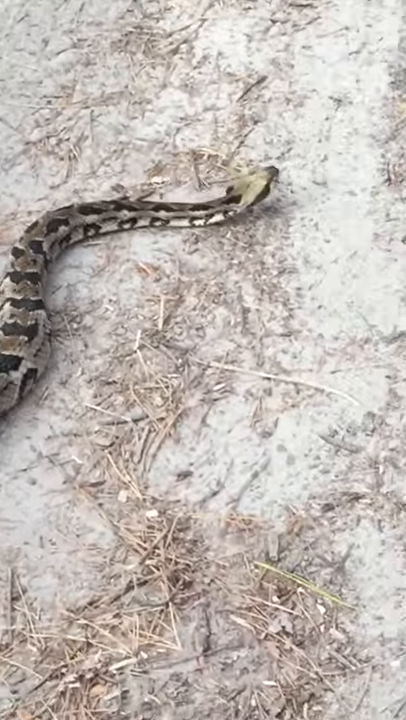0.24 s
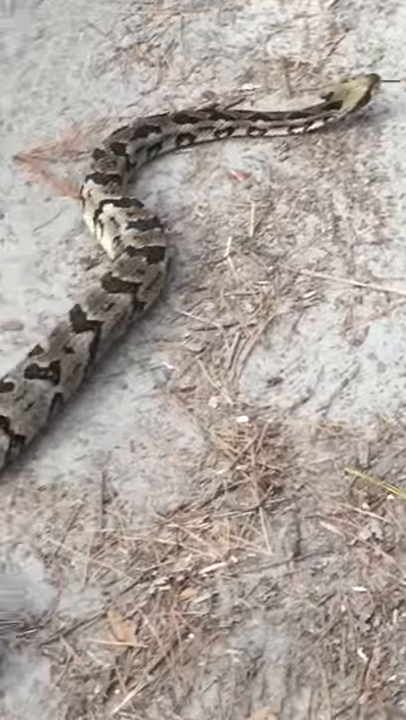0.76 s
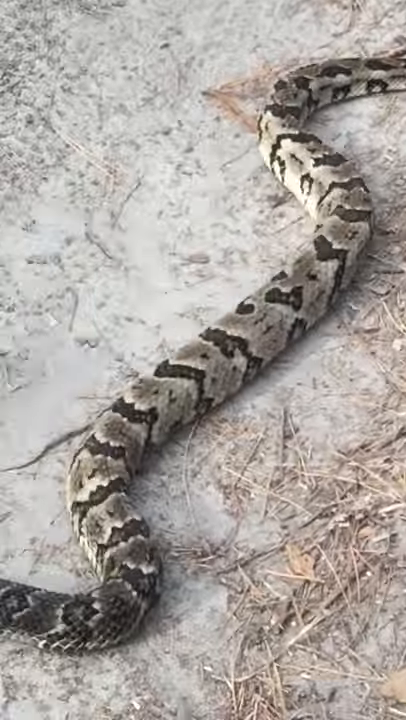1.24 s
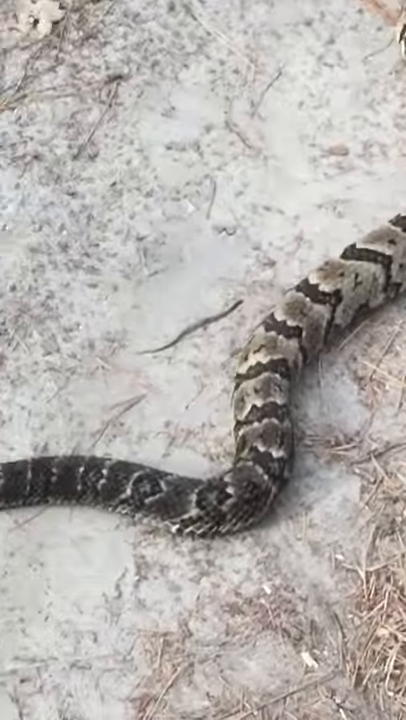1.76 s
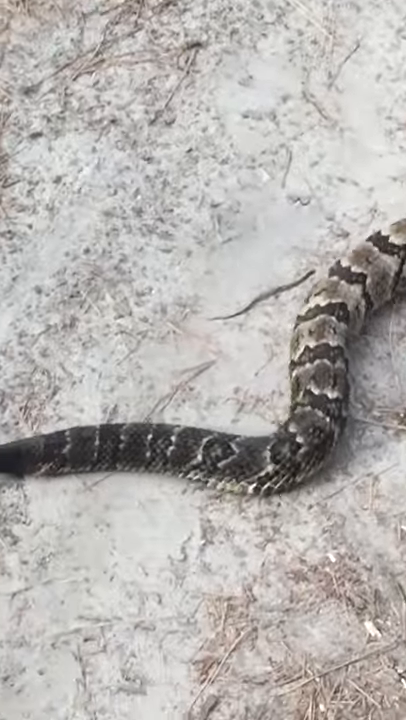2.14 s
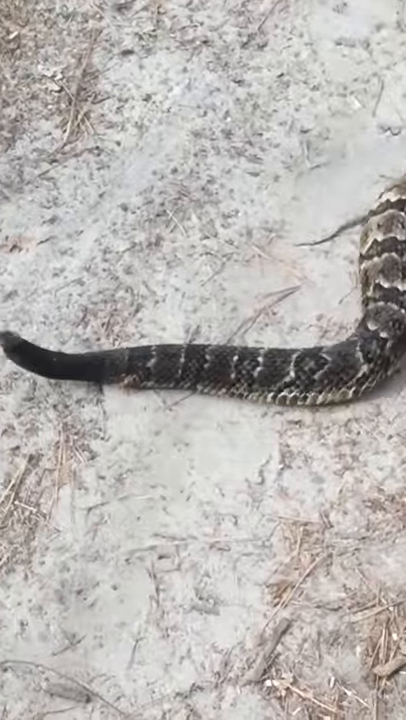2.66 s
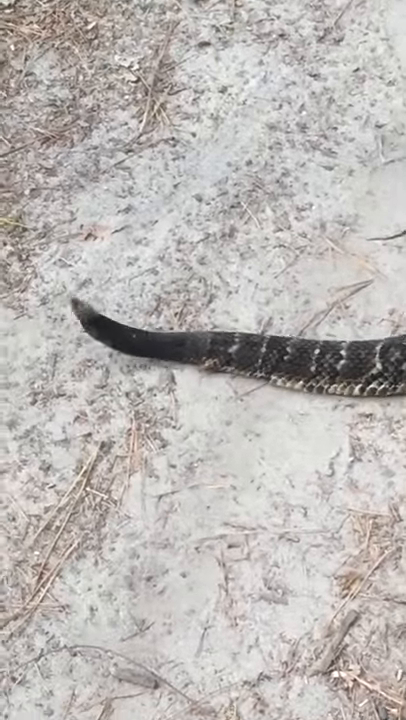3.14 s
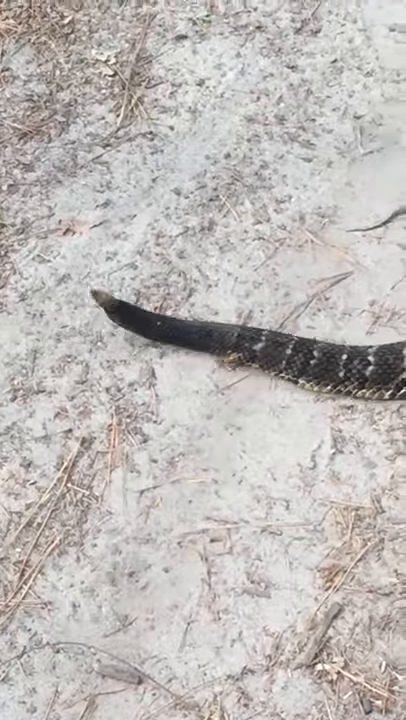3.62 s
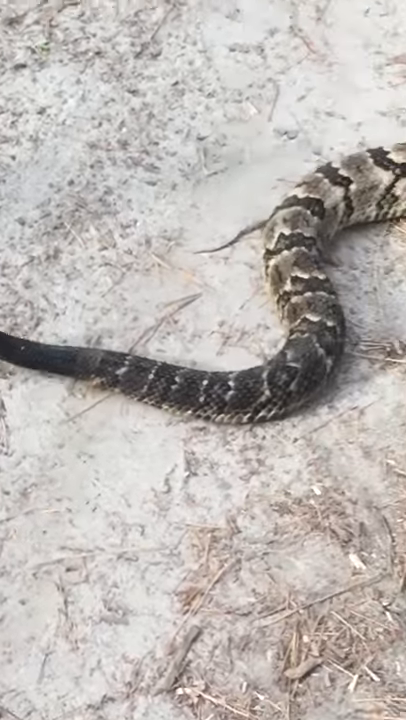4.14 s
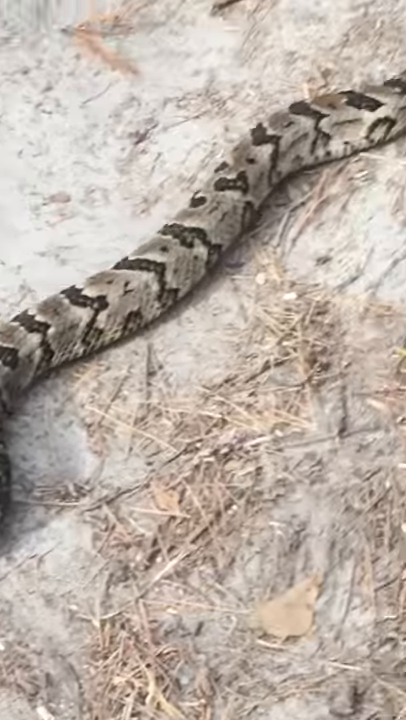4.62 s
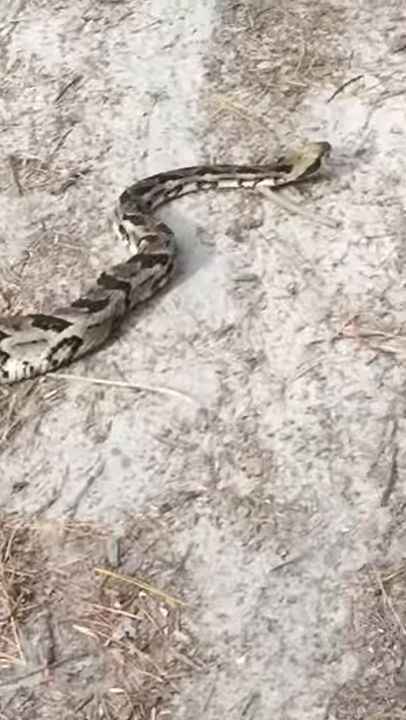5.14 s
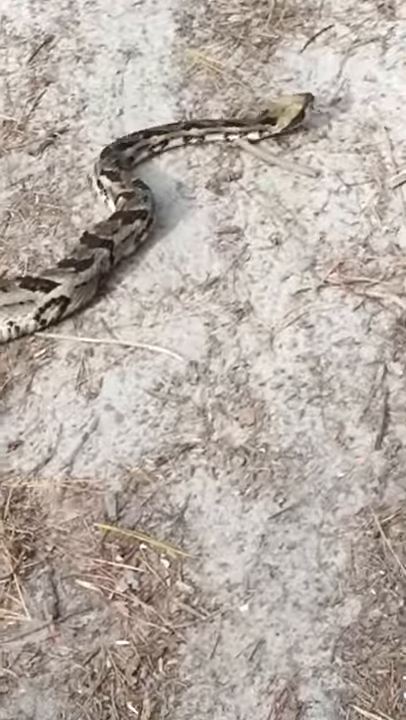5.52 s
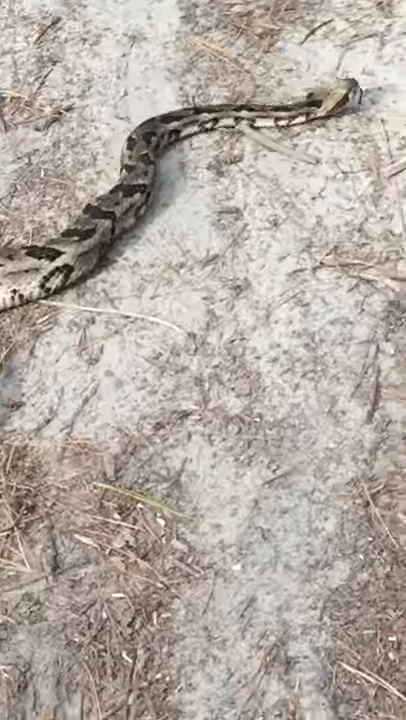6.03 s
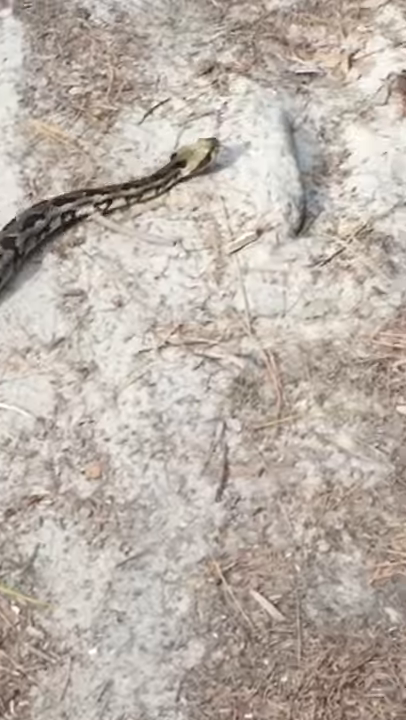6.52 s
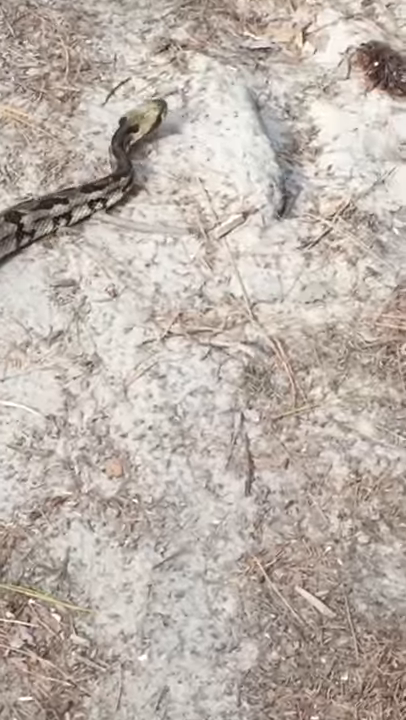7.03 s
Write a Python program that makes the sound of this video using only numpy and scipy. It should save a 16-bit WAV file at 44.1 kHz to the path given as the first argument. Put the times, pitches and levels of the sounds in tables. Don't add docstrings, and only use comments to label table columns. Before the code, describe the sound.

A rattlesnake's rattle is sounding from the first instant and continues unbroken for about 7.3 seconds. It is a dry, bright, grainy buzz, roughly 94 strokes a second, made of tiny hollow clicks and sharp sizzling edges, with no low body of its own. Around 0.2 and 0.36 seconds two soft, low thuds come from the hand holding the microphone. From about 0.8 to 5.2 seconds the tail is heard more side on; its timbre shifts noticeably around 3 to 4 seconds as it turns. After about 5.9 seconds it is drawn away, with slightly faster strokes and an airier treble edge. Far below lies faint traffic: puffs of rumble, an engine swell near 1.1 seconds, a smaller one near 6.5, and a slight tyre-hum rise around 6.1. Leaf litter rustles very softly, a little more toward the end. The place is open and nearly echo-free.

```python
import sys
import numpy as np
from scipy import signal
from scipy.fft import rfft, irfft, next_fast_len
from scipy.io import wavfile
from scipy.ndimage import uniform_filter1d, map_coordinates

SR = 44100
rng = np.random.default_rng(int(sys.argv[2]) if len(sys.argv) > 2 else 0)


def to_linear_factor(level_db):
    exponent = np.asarray(level_db, float) / 20
    return 10 ** exponent


def to_wav(s):
    ch = np.atleast_2d(s).T
    pcm = np.round(np.clip(ch, -1, 1) * 32767)
    wavfile.write(sys.argv[1], SR, pcm.astype(np.int16))


N = 320607
T = np.arange(N) / SR

# time in seconds, share turned away from 0 to 1.
AWAY = [(0, 1), (.45, .7), (.8, 0), (5.2, 0), (5.9, 1), (7.27, 1)]


def unit(x):
    return x / np.sqrt(np.mean(x ** 2) + 1e-20)


def curves(rows):
    s, *columns = np.transpose(rows)
    return [np.interp(T, s, column) for column in columns]


def filtered(x, response):
    m = next_fast_len(N + 8192)
    spectrum = rfft(x, m) * response(np.fft.rfftfreq(m, 1 / SR))
    return irfft(spectrum, m)[..., :N]


def coloured(x, spectrum):
    f, db = np.transpose(spectrum)
    return unit(filtered(x, lambda hz: to_linear_factor(np.interp(np.log(hz + 1), np.log(f), db))))


def wobble(rate):
    knots = rng.standard_normal(int(N * rate / SR) + 4)
    return map_coordinates(knots, [T * rate])


def hump(s, half):
    return np.exp(-((T - s) / half) ** 2 / 2)


def patchy(depth_db):
    z = signal.stft(rng.standard_normal(N), nperseg=1024)[2]
    field = uniform_filter1d(rng.standard_normal(z.shape), size=5, axis=0)
    field = uniform_filter1d(field, size=5, axis=1)
    return signal.istft(z * to_linear_factor(depth_db * unit(field)), nperseg=1024)[1][:N]


def dip(hz, dip_hz, width_hz, depth):
    return 1 - np.clip(depth, 0, 1) / (1 + ((hz - dip_hz) / width_hz * 2) ** 2)


def summed(times, shapes):
    at = np.round(times * SR).astype(int)[:, None] + np.arange(shapes.shape[1])
    inside = (at >= 0) & (at < N)
    return np.bincount(at[inside], shapes[inside], N)


def road_rumble():
    # frequency in Hz, level in dB per Hz.
    rumble_spectrum = [(13, -58), (22, -13), (47, -4.5), (65, 7.5), (130, -6), (170, -78), (290, -120)]
    # time in seconds, rise in dB.
    puffs = [(.62, 11), (1.3, 5), (1.82, 11), (1.97, 9), (2.16, 9.5), (2.54, 4), (2.84, 4), (3.24, 3),
             (3.94, 8), (4.19, -3), (4.38, 2), (4.68, 3), (5.23, 4.5), (5.33, 0), (5.75, 8), (5.84, 8),
             (6.03, 5), (6.7, 8), (7.04, 8), (7.22, 5)]
    half_s = .028
    puffs_db = sum(db * hump(s, half_s) for s, db in puffs) + 1.4 * wobble(9)
    return to_linear_factor(-62.5 + puffs_db) * coloured(rng.standard_normal(N), rumble_spectrum)


def engine_drone():
    # frequency in Hz, level in dB per Hz.
    drone_spectrum = [(70, -37), (115, -4.5), (150, -4), (250, -14.5), (400, -19), (600, -50)]
    # time in seconds, rise in dB, half length in seconds.
    swells = [
        (0.357, 5.5, 0.043),
        (1.132, 8.5, .1),
        (5.3, 1.5, 0.021),
        (6.518, 5, .08),
    ]
    swells_db = sum(db * hump(s, half) for s, db, half in swells) + 1.7 * wobble(4.02)
    return to_linear_factor(-66.5 + swells_db) * coloured(patchy(depth_db=1.5), drone_spectrum)


def tyre_hum():
    # frequency in Hz, level in dB per Hz.
    traffic_spectrum = [(150, -16), (250, -9), (483, -4.5), (545, -2), (836, 0.5), (909, 2.5), (1530, -6),
                        (2300, -21), (2990, -67), (5060, -120)]
    # time in seconds, rise in dB, half length in seconds.
    passing = (6.1, 3, 0.15)
    pass_s, rise_db, half_s = passing
    level_db = -59.5 + rise_db * hump(pass_s, half_s) + 0.31 * wobble(2.94) + 0.23 * wobble(14)
    return to_linear_factor(level_db) * coloured(patchy(depth_db=2.5), traffic_spectrum)


def leaves():
    # frequency in Hz, level in dB per Hz.
    leaf_spectrum = [(900, -30), (1500, -3), (2200, 0), (4000, -8), (7000, -19), (16000, -30)]
    slides_s, rise_db = 3, 4
    level_db = -66.5 + rise_db * curves(AWAY)[0] * (T > slides_s)
    return to_linear_factor(level_db) * coloured(patchy(depth_db=3.5), leaf_spectrum)


def handling():
    # time in seconds, peak in dB, frequency in Hz, half length in seconds.
    bumps = [
        (0.223, -39, 60, 0.0077),
        (0.356, -35.5, 61.3, 0.02),
    ]
    return sum(to_linear_factor(db) * hump(s, half) * np.cos(2 * np.pi * hz * (T - s)) for s, db, hz, half in bumps)


def forest(x):
    t = np.arange(SR // 8) / SR
    tail = rng.standard_normal(len(t)) * to_linear_factor(-60 * t / 0.11)
    answer = signal.fftconvolve(x, tail / np.linalg.norm(tail))[:N]
    return filtered(answer, lambda hz: 1 / (1 + (hz / 9000) ** 4))


def segment_levels():
    # middle level in dB, swing in dB, angle of the highest level in degrees.
    level_swings = [(-45.5, 10, 133), (-44.5, 9.5, 37), (-47, 12, -13.5), (-33, 14, 188.5)]
    # time in seconds, angle in degrees.
    angle_rows = [(0, 5), (.15, 38), (.34, 42), (.47, 69), (2.75, 65), (3.05, 59), (3.3, 22), (3.6, -27),
                  (4.2, -7), (4.5, 1), (5.1, 31), (5.4, 5), (5.7, -8), (6.0, -29), (6.25, -53), (6.6, -60),
                  (6.9, -37), (7.27, -11)]
    angle = curves(angle_rows)[0]
    return [db + swing_db * np.cos(np.radians(angle - highest_at)) for db, swing_db, highest_at in level_swings]


def collisions():
    # time in seconds, strokes per second.
    speed = [(0.0, 93.99), (0.79, 94.92), (0.79, 93.65), (1.7, 95.26), (1.71, 97.22), (2.04, 93.09),
             (2.33, 95.75), (2.35, 94.6), (3.38, 92.99), (3.38, 94.06), (4.06, 93.95), (4.3, 91.93),
             (4.81, 94.2), (5.48, 93.3), (6.13, 99.31), (6.63, 96.01), (6.92, 98.66), (7.27, 96.92)]
    places = [.69, .82, .9, .945, 1.06, 1.19, 1.71, 1.82, 1.92, 1.965, 2.07, 2.2]
    # strength in dB, time scatter in strokes,
    # extra dB of the deepest segment, extra dB of the second segment.
    blows = [(-9.5, .015, -4, 0), (-2.5, .018, -3, -7), (-5, .025, 0, 0), (-.5, .025, -2, 1),
             (-8.5, .04, 7, -1), (-12.5, .06, 1, -3), (-8.5, .015, 1, -1), (-13, .04, 1, 2),
             (-4, .02, -4, -1), (.5, .02, -3, -1.5), (-6.5, .04, 7, 0), (-12, .06, 2, -3)]
    strokes = .385 + np.cumsum(curves(speed)[0]) / SR
    db, scatter, deep_db, second_db = np.transpose(blows)
    per_stroke = len(places) // 2
    pairs = np.arange(-2, strokes[-1], 2)[:, None]
    place = pairs + places + scatter * rng.standard_normal((len(pairs), len(places)))
    force, late = np.repeat(rng.standard_normal((2, len(pairs), 2)), per_stroke, axis=2)
    place = place + .025 * late
    times = np.interp(place, strokes, T, left=-1, right=-1).ravel()
    strength_db = db + 2.5 * rng.uniform(-1, 1, place.shape)
    strength_db = strength_db + 0.6 * np.clip(force, -2, 1.5)
    strength_db = strength_db + 0.6 * np.repeat([1, -1], per_stroke)
    extra_db = np.tile([deep_db, second_db, 0 * db, 0 * db], len(pairs))
    return times, strength_db.ravel(), extra_db


def edge_ticks(times, db, t):
    # frequency in Hz, level in dB per Hz.
    side_on = [(4410, -25), (7500, -3), (7900, -6), (9470, -5.5), (10600, -8), (13900, -4), (15600, -7.5)]
    # frequency in Hz, level in dB per Hz.
    drawn_away = [(4410, -13), (7500, -5.5), (8800, -10), (9790, -8), (10500, -6.5), (11300, -10),
                  (12200, -9), (13300, -6.5), (14200, -3.5), (15600, -9)]
    scrape = to_linear_factor(-7 - 60 * t / .003) + to_linear_factor(-3 - 60 * t / .009) + to_linear_factor(-19 - 60 * t / .018)
    ticks = summed(times, to_linear_factor(db[:, None]) * scrape * rng.standard_normal((len(times), len(t))))
    away = curves(AWAY)[0]
    near = (1 - away) * coloured(ticks, side_on)
    far = to_linear_factor(-0.8) * away * coloured(ticks, drawn_away)
    return to_linear_factor(-39) * (near + far)


def rattle():
    # frequency in Hz, pitch scatter as a share,
    # t60 in seconds, strength scatter in dB.
    shells = [(3376, 0.059, 0.012, 2.5), (4315, 0.045, 0.0062, 0.5), (5538, 0.074, 0.0051, 1),
              (6540, 0.056, 0.021, 3.5)]
    # frequency in Hz, width in Hz, depth as a
    gaps = [(3606, 216, 0.23), (4980, 120, 0.2), (7700, 350, 0.31)]
    times, db, extra_db = collisions()
    t = np.arange(420) / SR
    sound = np.zeros(N)
    for (hz, detune, t60, spread_db), drive_db, level_db in zip(shells, extra_db, segment_levels()):
        pitch, size, late = rng.uniform(-1.7, 1.7, (3, len(times), 1))
        strength = to_linear_factor((db + drive_db)[:, None] + spread_db * size)
        decay = to_linear_factor(-60 * t / (0.36 * t60)) + to_linear_factor(-17.5 - 60 * t / (1.66 * t60))
        onset = 1 - np.exp(-t / 0.00021)
        ring = np.sin(2 * np.pi * hz * np.exp(detune * pitch) * t) * onset
        shell = summed(times + .00015 * late[:, 0], strength * decay * ring)
        hollow = lambda f: 1j * f * 1500 / (hz ** 2 - f ** 2 + 1j * f * 1500)
        sound += to_linear_factor(level_db) * unit(filtered(shell, hollow))
    sound += edge_ticks(times, db, t)
    small = lambda f: 1 / (1 + (2500 / (f + 1)) ** 5)
    return filtered(sound, lambda f: small(f) * np.prod([dip(f, *gap) for gap in gaps], axis=0))


def scene():
    surroundings = road_rumble() + engine_drone() + tyre_hum() + leaves()
    tail = rattle()
    return (tail + to_linear_factor(-17.5) * forest(tail) + surroundings + handling())[None]


def roll_off(x):
    return signal.sosfilt(signal.butter(12, 16750, fs=SR, output="sos"), x)


def record(dry):
    # frequency in Hz, width in Hz, depth as a share.
    port = (10450, 600, .55)
    top_hz = 15850
    mix = filtered(dry, lambda hz: dip(hz, *port) * (hz < top_hz))
    return roll_off(mix)


dry = scene()
out = record(dry)
to_wav(out)
```